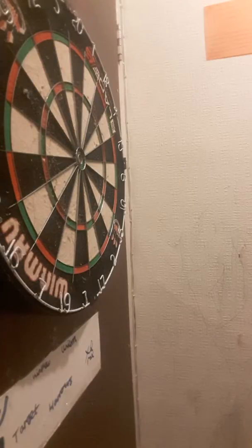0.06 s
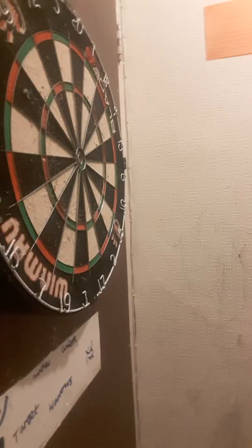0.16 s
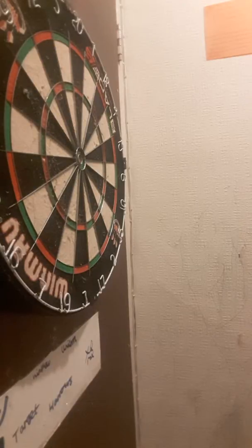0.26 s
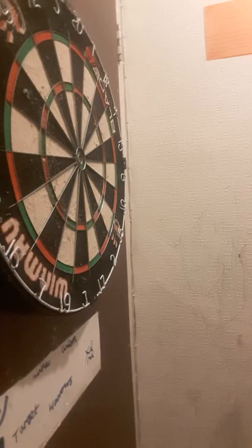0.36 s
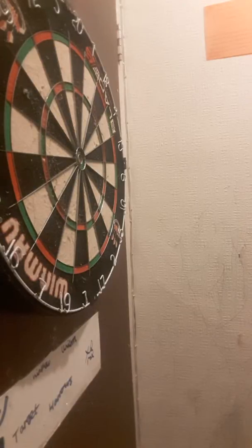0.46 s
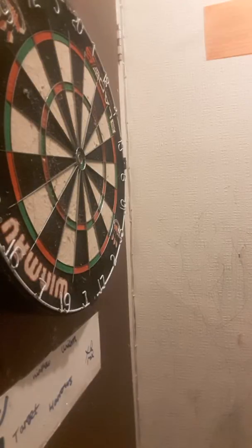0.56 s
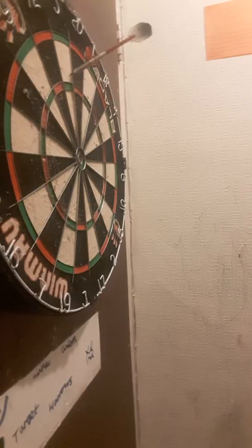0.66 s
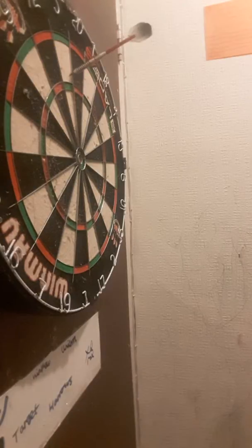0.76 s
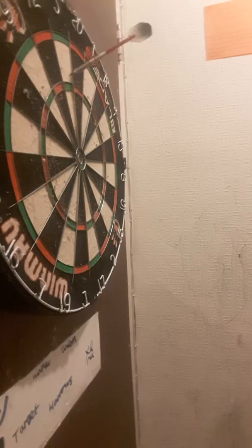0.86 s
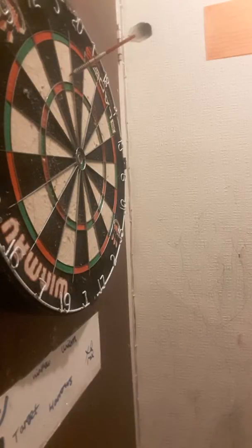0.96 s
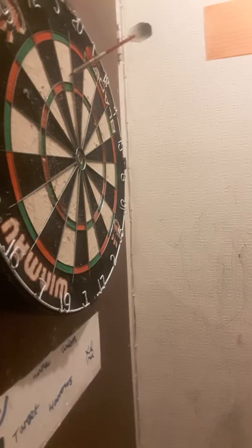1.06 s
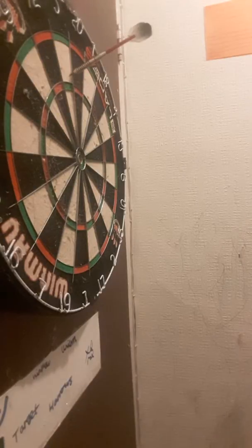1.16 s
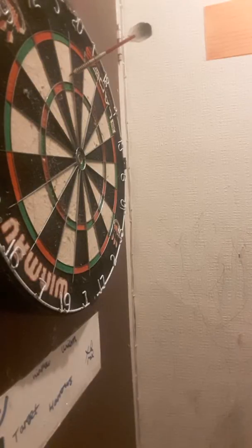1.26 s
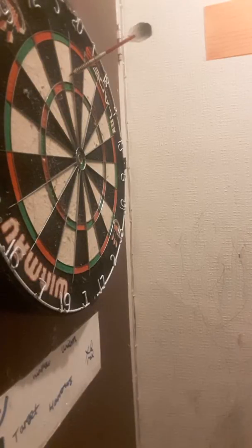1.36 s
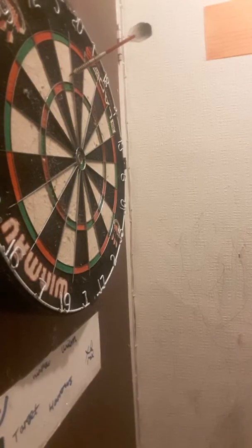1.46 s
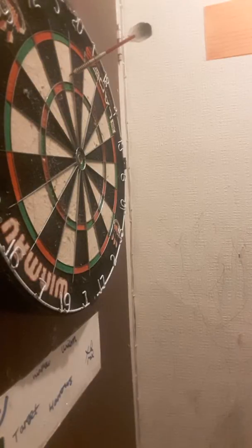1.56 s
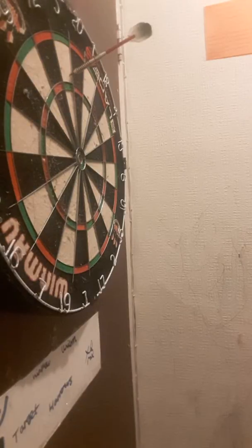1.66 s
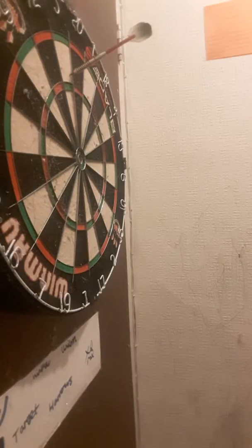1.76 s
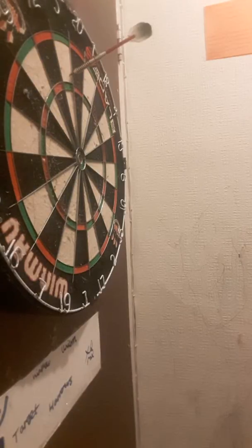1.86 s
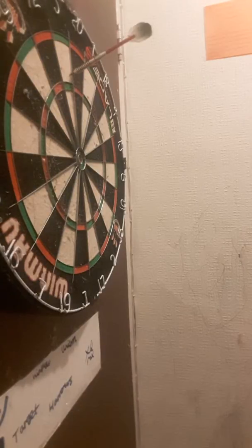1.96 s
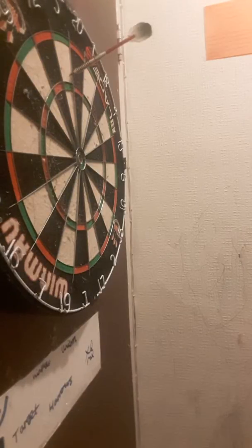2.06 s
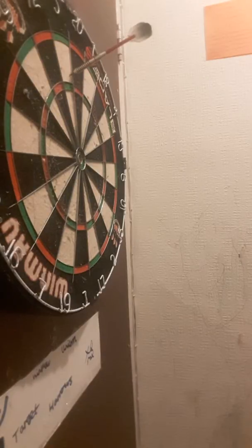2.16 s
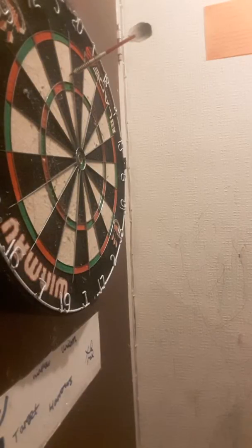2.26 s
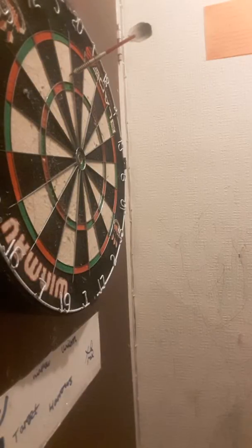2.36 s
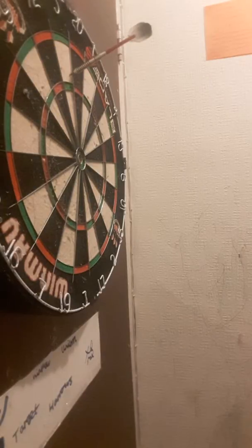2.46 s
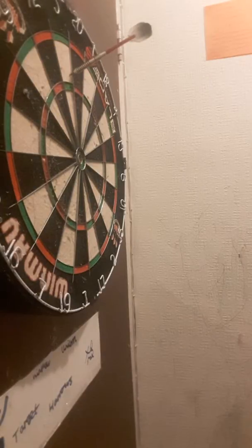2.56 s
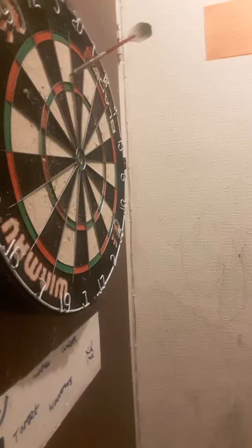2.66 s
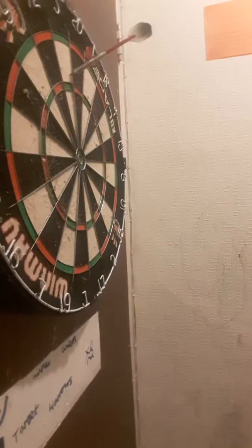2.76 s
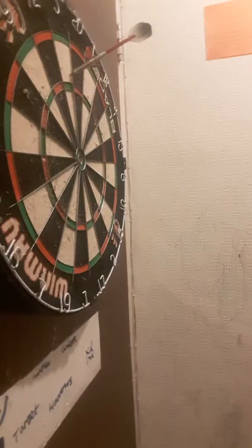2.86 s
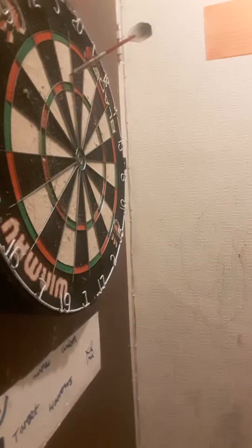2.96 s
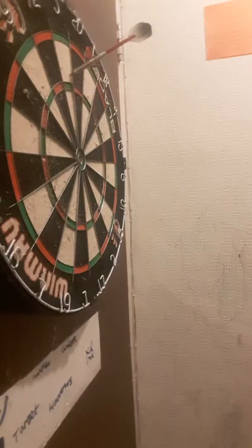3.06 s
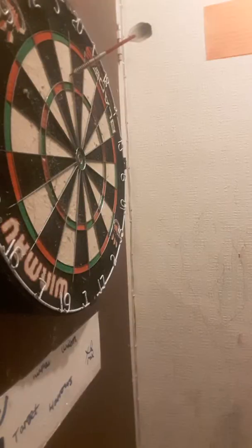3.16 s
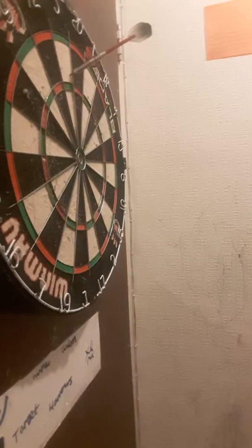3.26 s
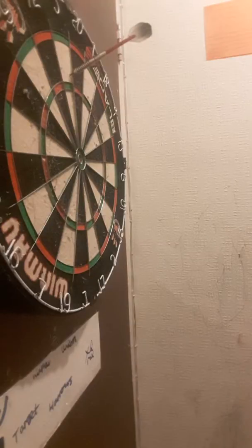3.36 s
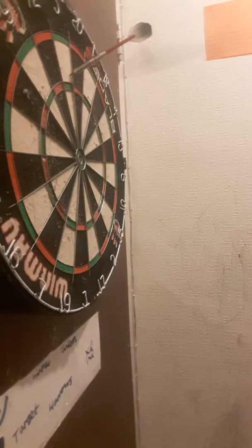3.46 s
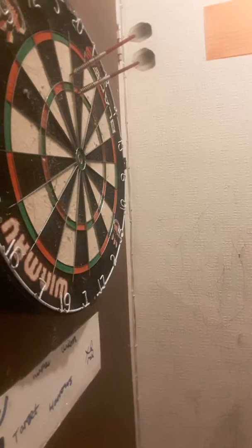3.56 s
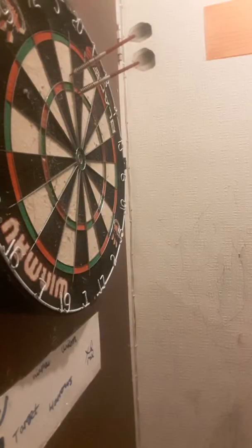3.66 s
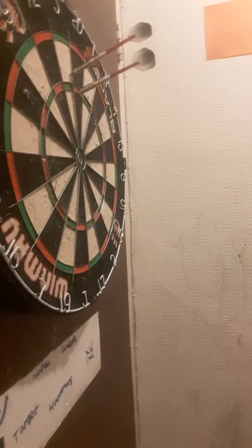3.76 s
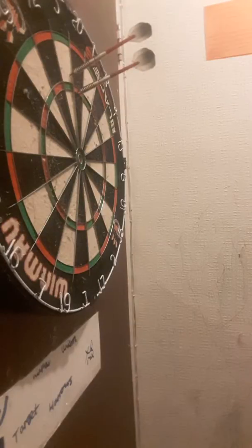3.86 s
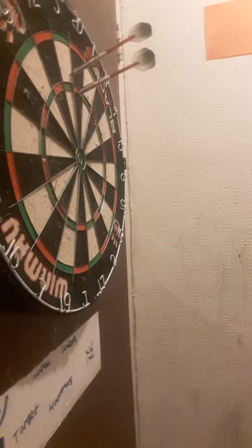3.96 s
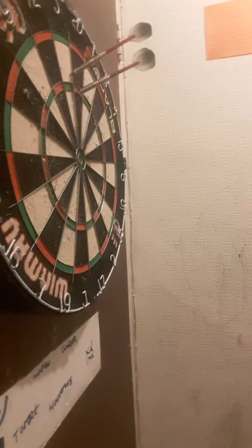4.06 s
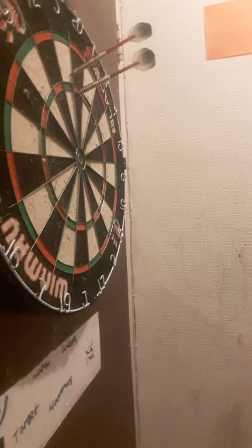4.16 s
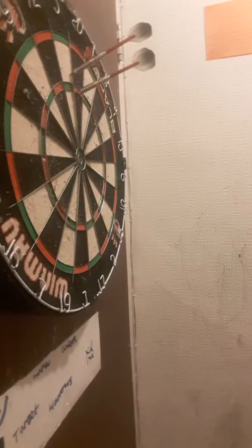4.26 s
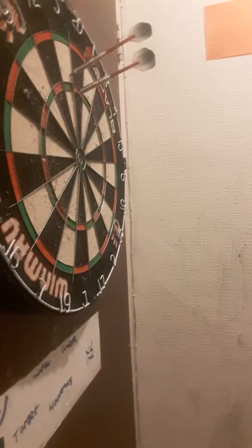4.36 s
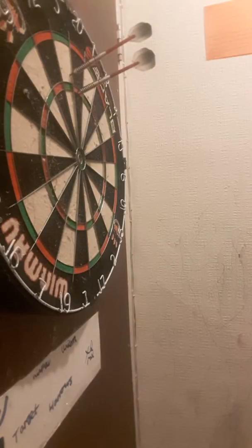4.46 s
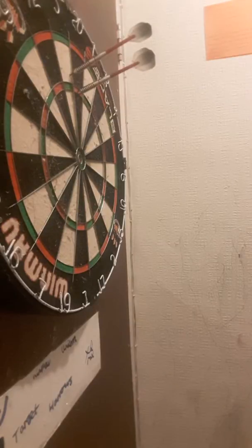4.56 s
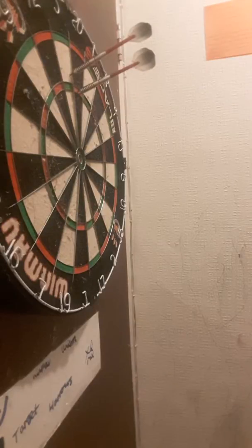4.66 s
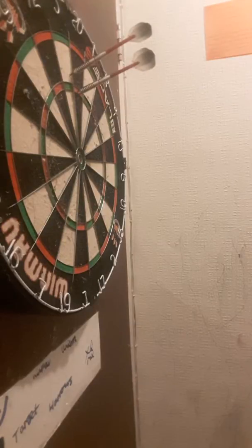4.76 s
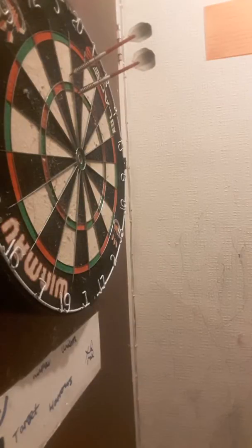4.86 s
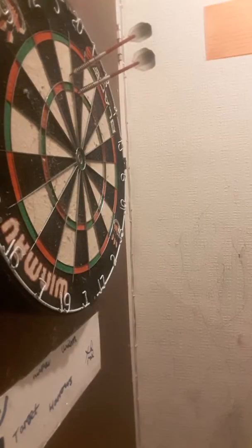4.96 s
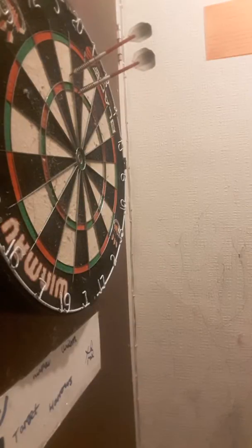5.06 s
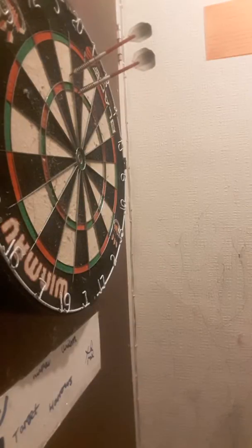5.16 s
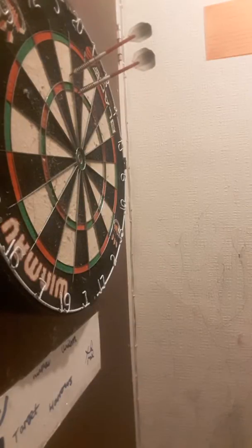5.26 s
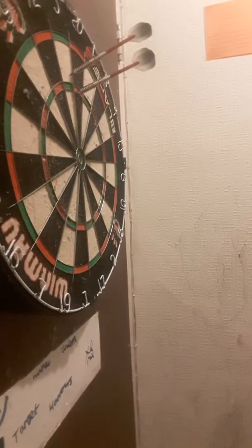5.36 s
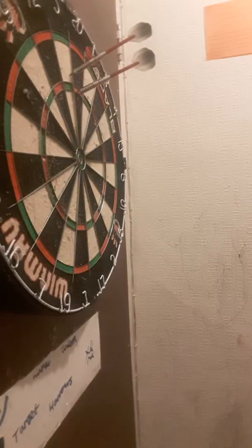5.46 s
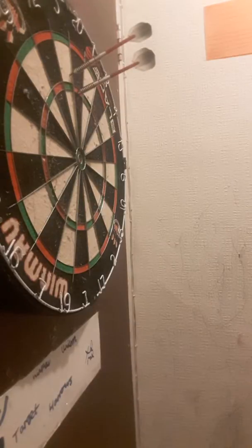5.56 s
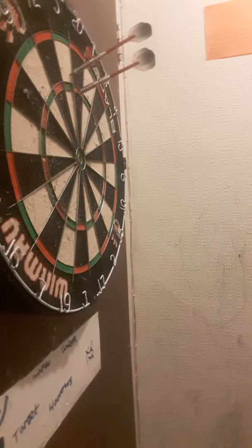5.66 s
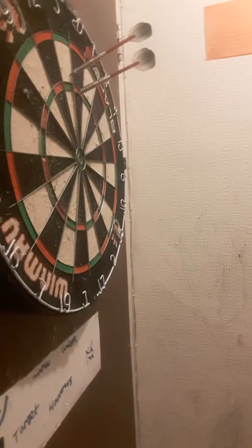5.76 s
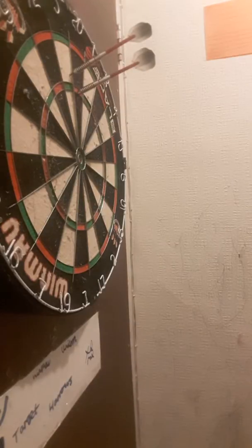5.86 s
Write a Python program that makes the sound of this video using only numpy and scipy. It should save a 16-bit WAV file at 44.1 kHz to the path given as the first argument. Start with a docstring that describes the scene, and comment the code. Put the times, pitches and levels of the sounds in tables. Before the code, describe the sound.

A small, quiet indoor room heard from right beside a bristle dartboard, with faint steady air and a very weak low hum. Barely audible floor rumble marks the thrower shifting weight. At about 0.7 s a dart hits: a sudden, loud, deep thump with a short fibre crunch, a dull knock and a hollow wooden boom dying within half a second, with a tiny tick just after. Very faint clicks of darts in the hand come at 1.2 and 1.7 s, then soft shifting near 2 and 2.9 s. At 3.55 s the second dart lands, equally heavy but sharper and crunchier, its plastic flight buzzing in a few rapid snaps, with small ticks at 3.6 and 3.7 s. From 4.3 s soft, dull, irregular footsteps bump and brush the floor, strongest around 4.8 s, with one faint dart click at 4.7 s, continuing to about 5.7 s.

```python
"""Close to the microphone in a small quiet room, weight shifts on the floor, then two darts hit a dartboard in turn.
Each point crunches into the fibres as noise; a pressure jerk, a rap and a knock mark the stop,
decaying modes make the boom of board and door, and the plastic flight buzzes as a few noise snaps.
Small ticks follow the blows, and after each throw darts click in the hand as short resonant noise.
Soft steps of low tones and noise come last; steady air noise and a faint hum lie beneath it all."""
import sys
import numpy as np
from scipy import signal
from scipy.fft import rfft, irfft, next_fast_len
from scipy.io import wavfile
from scipy.ndimage import map_coordinates

SR = 44100
rng = np.random.default_rng(int(sys.argv[2]) if len(sys.argv) > 2 else 0)


def master(y):
    """Save y as 16-bit WAV."""
    cut = np.clip(np.atleast_2d(y).T, -1, 1)
    pcm = np.round(cut * 32767)  # scale
    wavfile.write(sys.argv[1], SR, pcm.astype(np.int16))


N = 261072  # length of the scene in samples
T = np.arange(SR) / SR  # one second of time after a contact, s

# the throws: [start_s, spot (0 = high spot on the board, 1 = lower spot), boom_db, push_db, knock_db, rap_db,
#  crunch_db, crunch_t60_s, hiss_db]
THROWS = [(0.6833, 0.12, -2.5, -13.5, -29, -31.5, -47, 0.14, -63.5),
          (3.553, 0.95, -2, -15.5, -22.5, -28, -35.5, 0.17, -60)]
# bright snap of a flight or a settling board: [pitch_hz, density_db (dB per Hz)]
SNAP_SPECTRUM = [(2000, -14.5), (7000, -16.5), (10000, -3), (13500, -4), (15500, -13.5)]
# sole slapping or brushing the floor: [pitch_hz, density_db (dB per Hz)]
SOLE_SPECTRUM = [(200, -12), (700, 9), (1300, -0.5), (2500, -11), (6000, -39), (15000, -44)]


def amp(db):
    """Turn decibels into gain."""
    return 10 ** (np.asarray(db) / 20)


def unit(x):
    """Scale a sound to rms 1."""
    return x / np.sqrt(np.mean(x ** 2) + 1e-20)


def along(points, hz):
    """Read (Hz, value) points at any frequency, interpolated on a log axis."""
    point_hz, values = np.transpose(points)
    return np.interp(np.log(hz + 1), np.log(point_hz), values)


def filtered(x, response):
    """Multiply the spectrum of x by a response of frequency."""
    size = next_fast_len(len(x) + 8192)
    spectrum = rfft(x, size) * response(np.fft.rfftfreq(size, 1 / SR))
    return irfft(spectrum, size)[:len(x)]


def noise(spectrum, size=SR):
    """Coloured noise of rms 1 from a (Hz, dB per Hz) spectrum."""
    white = rng.standard_normal(size)
    return unit(filtered(white, lambda hz: amp(along(spectrum, hz))))


def resonant(peaks):
    """A second of noise of rms 1, gathered around (Hz, width Hz, dB) resonances."""
    def response(f):
        return sum(amp(db) / (1 + (2 * (f - hz) / width) ** 2) for hz, width, db in peaks)
    return unit(filtered(rng.standard_normal(SR), response))


def fade(t60, t=T):
    """Exponential decay that falls 60 dB in t60 seconds."""
    return np.exp(-np.log(1000) * t / t60)


def rise(attack):
    """Soft start with a time constant of attack seconds."""
    return 1 - np.exp(-T / attack)


def swell(attack, hold, t60):
    """Linear attack, hold and exponential release, all in seconds."""
    return np.minimum(T / attack, 1) * fade(t60, np.maximum(T - attack - hold, 0))


def add(track, s, sound):
    """Mix a sound into the track from time s in seconds."""
    start = max(round(s * SR), 0)
    part = sound[:max(N - start, 0)]
    track[start:start + len(part)] += part


def darts(panel_lag_s=0.018, panel_db=-19, room_db=-26):
    """The point crunches in; a moment later the dart stops dead and drives the board."""
    # dull knock of the board: [pitch_hz, density_db (dB per Hz)]
    knock_spectrum = [(300, -2.5), (700, 6.5), (1050, -2.5), (1400, -11), (2200, -15.5), (3000, -22),
                      (3800, -52), (8000, -56.5)]
    # crunch of fibres and flight: [pitch_hz, density_db (dB per Hz)]
    crunch_spectrum = [(1000, -14.5), (2700, -8.5), (3900, -13), (4900, -5), (6500, -14), (8200, -9.5),
                       (9400, -2), (10200, -5), (11200, 1), (13000, -12), (15500, -20.5)]
    # hard rap of point and barrel: [pitch_hz, width_hz, level_db]
    rap_peaks = [(1144, 100, -4.5), (1530, 140, 1), (1906, 110, 3), (2106, 146, 1), (2533, 220, -16)]
    # hollow note of the door: [pitch_hz, width_hz, level_db]
    panel_peaks = [(328, 14, 0), (495, 40, -8), (864, 20, -2), (1030, 30, -14), (1156, 30, -15)]
    # lingering hiss: [pitch_hz, density_db (dB per Hz)]
    hiss_spectrum = [(300, 0.5), (1200, 20), (3000, 8), (5000, 4.5), (7500, -2.5), (11000, 1), (15500, -7)]
    entry_s, entry_db = 0.0034, -11  # lead of the entry over the stop, and its knock against the stop's
    out = np.zeros(N)
    for s, spot, boom_db, push_db, knock_db, rap_db, crunch_db, crunch_t60, hiss_db in THROWS:
        # the point parts the fibres
        crunch = noise(crunch_spectrum) * rise(0.00084) * fade(crunch_t60)
        add(out, s - entry_s, amp(crunch_db) * crunch)
        entry_knock = noise(knock_spectrum) * fade(0.058)
        add(out, s - entry_s, amp(knock_db + entry_db) * entry_knock)
        # the stop: one jerk, a hard rap and a duller knock
        add(out, s, amp(push_db) * push())
        add(out, s, amp(rap_db) * resonant(rap_peaks) * fade(0.11))
        add(out, s, amp(knock_db) * noise(knock_spectrum) * fade(0.23))
        # the board takes up the blow, the hollow note of the door a moment later
        add(out, s, amp(boom_db) * thud(spot))
        panel = resonant(panel_peaks) * rise(0.011) * fade(0.13)
        add(out, s + panel_lag_s, amp(panel_db) * panel)
        # the walls answer, and a faint hiss lingers
        add(out, s, amp(room_db) * room_tail() * rise(0.033))
        add(out, s, amp(hiss_db) * noise(hiss_spectrum) * rise(0.017) * fade(1.9))
    return out


def push(width_s=0.000284):
    """The face of the board jerks once as the dart stops: one short swing of pressure."""
    u = T / width_s - 2
    return -2 * u * np.exp(-u ** 2)


def thud(spot, attack_s=0.0005, waver=0.49, waver_rate_hz=22, sustain=0.95):
    """Modes of board and door ring down; the spot hit sets their balance and neighbours start in opposition."""
    # modes: [pitch_hz, t60_s (before the sustain factor), high_spot_db, low_spot_db]
    modes = [(42.3, 0.39, -25, -23.5), (59.1, 0.7, -32, -28.5), (71.93, 0.74, -38, -34),
             (99.9, 0.52, -28.5, -24), (118.7, 0.42, -21, -18.5), (143.1, 0.46, -18.5, -25.5),
             (172.5, 0.19, -8.5, -26.5), (191.3, 0.4, -19.5, -26.5), (203.4, 0.57, -29.5, -20),
             (240, 0.49, -26.5, -20), (251.4, 0.45, -26.5, -23), (276.5, 0.28, -25, -14.5),
             (299, 0.19, -32.5, -9.5), (334.2, 0.41, -19.5, -13), (374.4, 0.15, -24.5, -25.5),
             (390.5, 0.52, -28, -24), (422, 0.51, -35.5, -26), (453.3, 0.078, -17, -19),
             (493, 0.12, -20, -19), (516, 0.28, -26, -24), (592, 0.14, -22.5, -25.5), (644, 0.35, -37, -29),
             (685, 0.19, -26.5, -29), (726, 0.16, -29, -28.5), (777, 0.078, -23.5, -19.5),
             (840, 0.12, -25.5, -26.5), (913, 0.52, -42.5, -38.5), (1025, 0.071, -25.5, -19),
             (1129, 0.056, -25.5, -28)]
    out = np.zeros(SR)
    for k, (hz, t60, high_db, low_db) in enumerate(modes):
        db = high_db + np.clip(spot, 0, 1) * (low_db - high_db)
        # reflections gradually mix in and make the ring uneven in size and phase
        in_phase, quadrature = (map_coordinates(row, [waver_rate_hz * T])
                                for row in rng.standard_normal((2, 128)))
        uneven = 1 + waver * rise(0.038) * (in_phase + 1j * quadrature)
        ring = np.imag(uneven * np.exp(2j * np.pi * hz * T))
        out += (-1) ** k * amp(db) * ring * fade(sustain * t60)
    return rise(attack_s) * out


def room_tail():
    """Diffuse answer of the walls: noise whose decay time depends on frequency."""
    # colour of the answer: [pitch_hz, density_db (dB per Hz)]
    answer_spectrum = [(40, -15), (150, 6.5), (300, 10), (600, 1.5), (1100, -7.5), (1600, -18.5),
                       (4000, -73)]
    # reverberation of the room: [pitch_hz, t60_s]
    room_decay = [(100, 0.26), (400, 0.45), (1000, 0.41), (4000, 0.14)]
    hz, t, bands = signal.stft(noise(answer_spectrum), SR, nperseg=512)
    decaying = bands * fade(along(room_decay, hz)[:, None], t)
    return signal.istft(decaying, SR, nperseg=512)[1][:SR]


def afterticks():
    """The settling board gives small ticks after the blows, each a duller tock and a bright snap."""
    # ticks: [start_s, tock_db, snap_db]
    ticks = [(0.8085, -51, -63), (3.626, -42.5, -51), (3.6811, -49, -56.5)]
    # colour of the tock: [pitch_hz, density_db (dB per Hz)]
    tock_spectrum = [(500, -4), (1100, 0), (1600, -1), (2300, -6), (3200, -19), (7000, -30), (15500, -34)]
    out = np.zeros(N)
    for s, tock_db, snap_db in ticks:
        tock = noise(tock_spectrum) * rise(0.00069) * fade(0.066)
        snap = noise(SNAP_SPECTRUM) * fade(0.012)
        add(out, s, amp(tock_db) * tock + amp(snap_db) * snap)
    return out


def flights(swing_s=0.0063, uneven_db=2, count=5):
    """The plastic flight slaps in its slot once per swing while the shaft quivers to rest."""
    # flight of each dart: [start_s, first_snap_db (before random unevenness), loss_per_swing_db]
    buzzes = [(0.6843, -50, 0.5), (3.551, -27, 8.5)]
    out = np.zeros(N)
    for s, first_db, loss_db in buzzes:
        for k, chance in enumerate(rng.standard_normal(count)):
            db = first_db - k * loss_db + uneven_db * chance
            add(out, s + k * swing_s, amp(db) * noise(SNAP_SPECTRUM) * fade(0.014))
    return out


def hand(scrape_width_hz=2600, room_db=-27, room_t60_s=1.0):
    """Barrels and flights touch and rebound once; the fingers damp them and a faint tail stays in the room."""
    # touches: [start_s, level_db, ring_db, ring_pitch_hz, scrape_pitch_hz, contact_db]; ring and contact
    # levels are relative to the scrape
    clicks = [(1.228, -71.5, -3, 2340, 8400, -3), (1.71, -66, 11, 2015, 11400, 9.5),
              (4.728, -78, 10, 2570, 11600, -10)]
    # barrel resonances: [multiple of the ring pitch, width_hz, level_db]
    barrel = [(1, 250, 5.5), (2.3, 430, -9), (2.81, 277.8, -17), (4.47, 324.1, -12.5)]
    # hard contact: [pitch_hz, density_db (dB per Hz)]
    contact_spectrum = [(500, -2.5), (3000, -7), (8000, -24), (15500, -14.5)]
    rebound_s, rebound_db = 0.0059, 4.5  # gap to the second contact, and its level over the first
    tail = amp(room_db) * fade(room_t60_s)
    out = np.zeros(N)
    for s, db, ring_db, ring_hz, scrape_hz, contact_db in clicks:
        ring_peaks = [(ratio * ring_hz, width, level) for ratio, width, level in barrel]
        for k in range(2):
            scrape = resonant([(scrape_hz, scrape_width_hz, 0)]) * (fade(0.07) + tail)
            ring = resonant(ring_peaks) * (fade(0.09) + tail)
            contact = noise(contact_spectrum) * fade(0.022)
            touch = scrape + amp(ring_db) * ring + amp(contact_db) * contact
            add(out, s + k * rebound_s, amp(db + k * rebound_db) * touch)
    return out


def feet(dull_db=-8, roll_brush_db=-14.5):
    """A soft heel bumps the floor, the sole slaps, and the foot rolls onto its toes."""
    # footfalls: [start_s, bump_db, floor_pitch_hz, bump_t60_s, sole_slap_db, toe_roll_db]
    steps = [(4.306, -39, 213, 0.083, -69, -71), (4.651, -45, 191, 0.077, -65, -65),
             (4.776, -46, 243, 0.18, -53, -74), (4.81, -32.5, 142.6, 0.19, -67, -48.5),
             (5.055, -41, 139, 0.14, -58, -52.5), (5.346, -49, 204, 0.085, -60.5, -58),
             (5.653, -36.5, 243, 0.077, -61.5, -69)]
    # dull part of the heel bump: [pitch_hz, density_db (dB per Hz)]
    heel_spectrum = [(30, -23), (70, -0.5), (150, 4), (300, -8.5), (500, -19), (2000, -56)]
    out = np.zeros(N)
    for s, bump_db, hz, t60, sole_db, roll_db in steps:
        bump = np.sin(2 * np.pi * hz * T) + amp(dull_db) * noise(heel_spectrum)
        add(out, s, amp(bump_db) * bump * rise(0.0013) * fade(t60))
        slap = noise(SOLE_SPECTRUM) * rise(0.0011) * fade(0.2)
        add(out, s, amp(sole_db) * slap)
        roll = loaded_floor(roll_brush_db) * swell(attack=0.034, hold=0.097, t60=0.25)
        add(out, s, amp(roll_db) * roll)
    return out


def stance(sway_brush_db=-22, lean_lead_s=0.2, lean_db=-56, lean_brush_db=-11.5):
    """The thrower sways while aiming and leans forward ahead of each hit; every weight shift has one envelope."""
    # weight shifts while aiming: [start_s, level_db]
    sways = [(0, -57.5), (1.31, -59), (2.05, -55.5), (2.87, -55.5)]
    shift = swell(attack=0.03, hold=0.066, t60=0.32)
    out = np.zeros(N)
    for s, db in sways:
        add(out, s, amp(db) * loaded_floor(sway_brush_db) * shift)
    for s, *_ in THROWS:
        add(out, s - lean_lead_s, amp(lean_db) * loaded_floor(lean_brush_db) * shift)
    return out


def loaded_floor(brush_db):
    """The floor rumbles under moving weight while the sole brushes over it."""
    # rumble of the floor: [pitch_hz, density_db (dB per Hz)]
    floor_spectrum = [(40, -14.5), (90, -18.5), (143, 9), (193, -6), (278, 0.5), (450, -21), (1500, -52)]
    return noise(floor_spectrum) + amp(brush_db) * noise(SOLE_SPECTRUM)


def ambience(air_db=-63.5, drift_rad=0.6, drift_rate_hz=10):
    """Still room air as steady noise, with a distant appliance humming in tones of wandering phase."""
    # still air: [pitch_hz, density_db (dB per Hz)]
    air_spectrum = [(25, -11), (60, -5.5), (110, -2), (300, -6.5), (500, -11), (1200, -17.5), (2000, -23),
                    (4000, -31.5), (6000, -33.5), (7000, -40), (15500, -38)]
    # tones of the appliance: [pitch_hz, level_db (rms)]
    hum_tones = [(102.3, -71.5), (145.3, -75.5), (1190, -84), (3569, -94.5), (13081, -99)]
    t = np.arange(N) / SR
    out = amp(air_db) * noise(air_spectrum, size=N)
    for hz, db in hum_tones:
        wander = map_coordinates(rng.standard_normal(64), [drift_rate_hz * t])
        tone = np.sqrt(2) * np.sin(2 * np.pi * hz * t + drift_rad * wander)  # rms 1
        out += amp(db) * tone
    return out


def scene():
    """Sum every source at one microphone beside the board."""
    board = darts() + afterticks() + flights()
    thrower = hand() + feet() + stance()
    return (board + thrower + ambience())[None]


def record(dry, top_hz=15850):
    """The recorder cuts steeply above its band limit."""
    def band_limit(hz):
        return 1 / (1 + (hz / top_hz) ** 200)
    return np.array([filtered(x, band_limit) for x in dry])


dry = scene()
out = record(dry)
master(out)
```